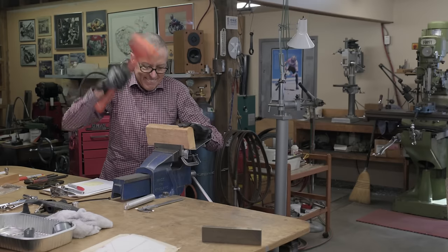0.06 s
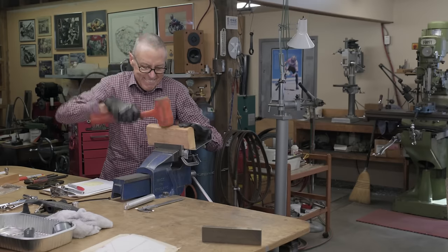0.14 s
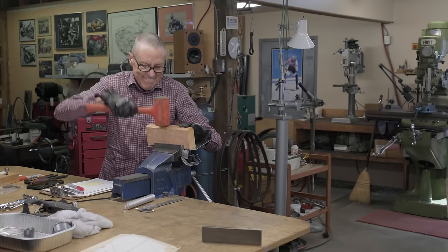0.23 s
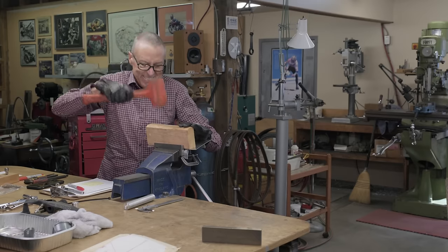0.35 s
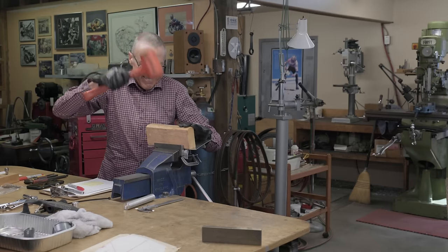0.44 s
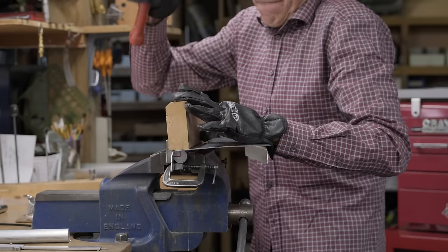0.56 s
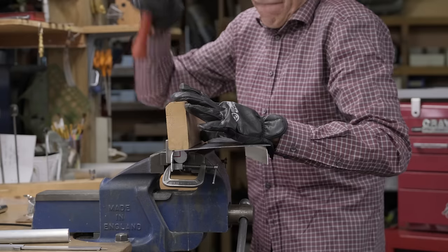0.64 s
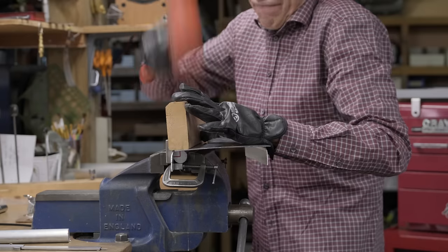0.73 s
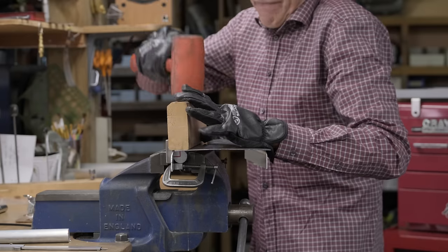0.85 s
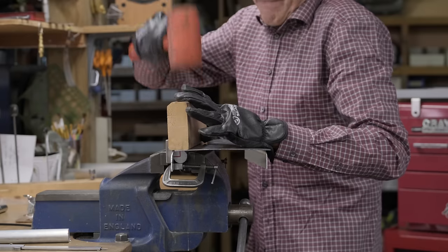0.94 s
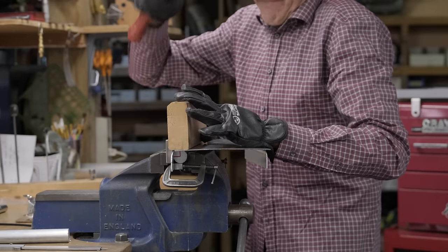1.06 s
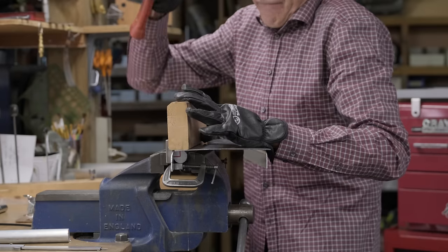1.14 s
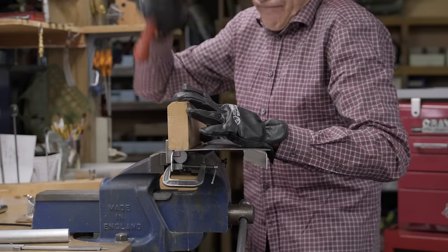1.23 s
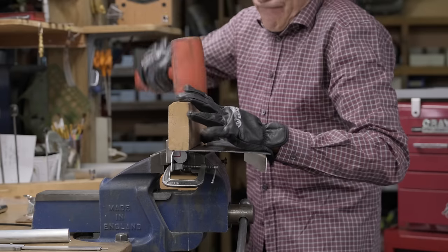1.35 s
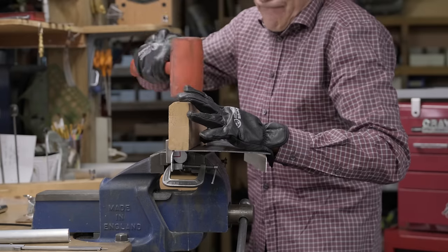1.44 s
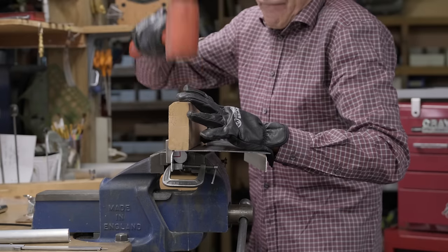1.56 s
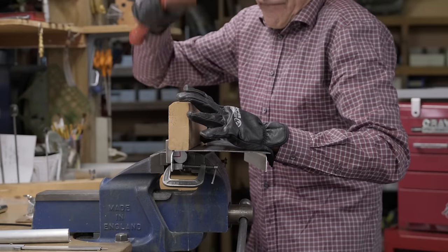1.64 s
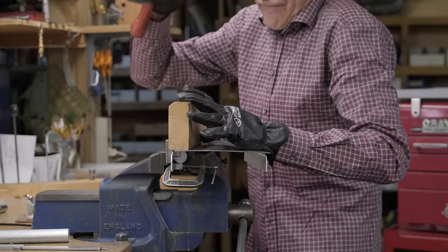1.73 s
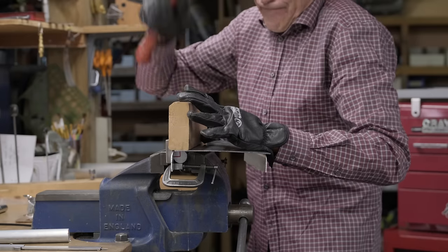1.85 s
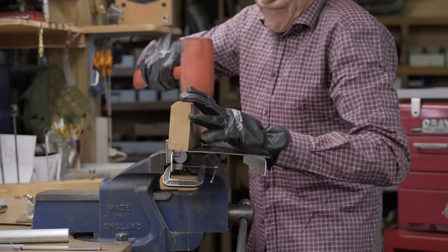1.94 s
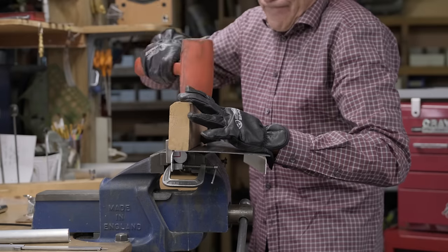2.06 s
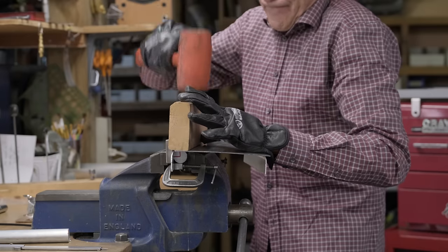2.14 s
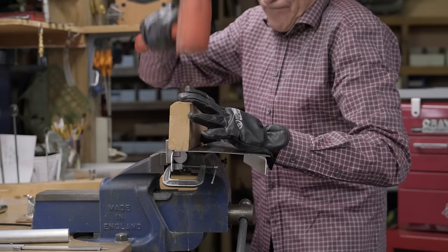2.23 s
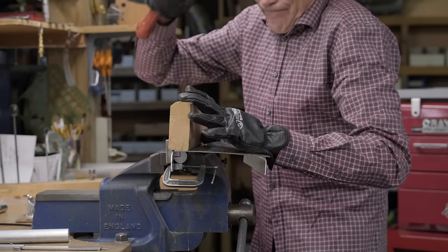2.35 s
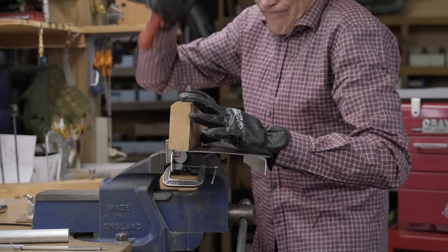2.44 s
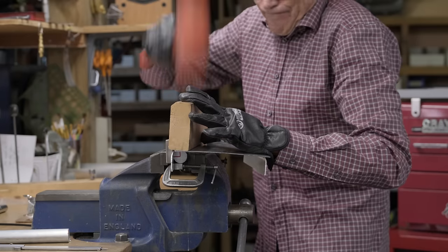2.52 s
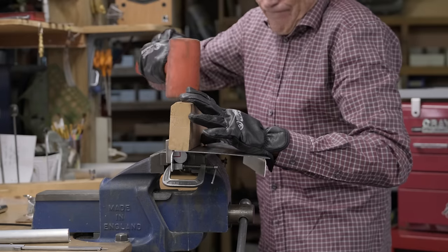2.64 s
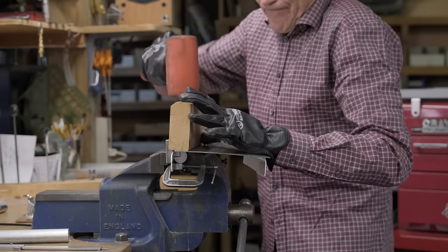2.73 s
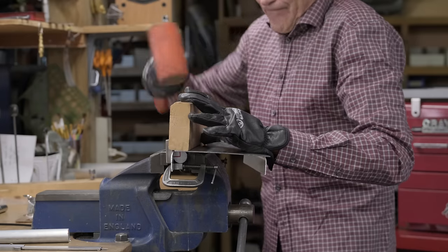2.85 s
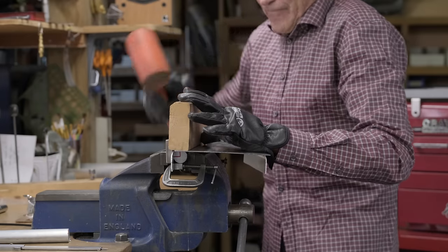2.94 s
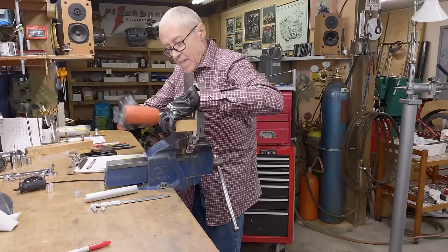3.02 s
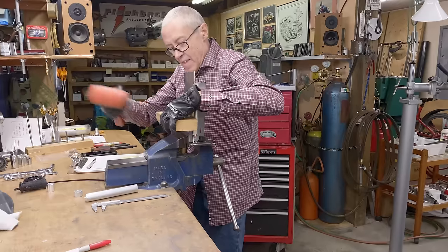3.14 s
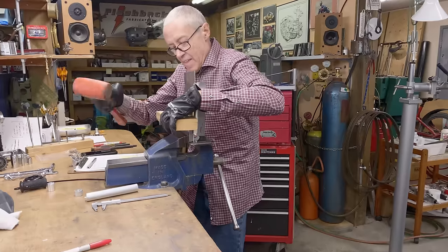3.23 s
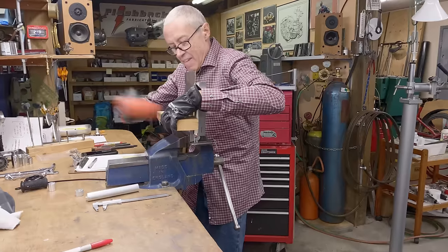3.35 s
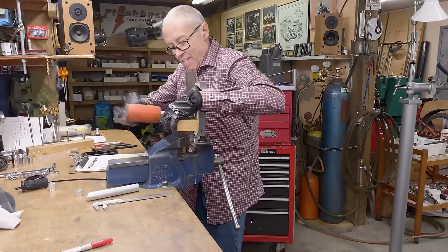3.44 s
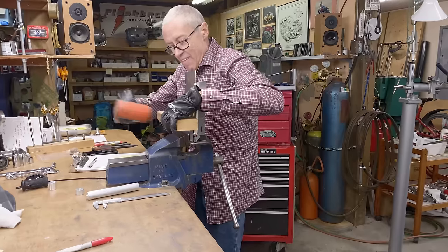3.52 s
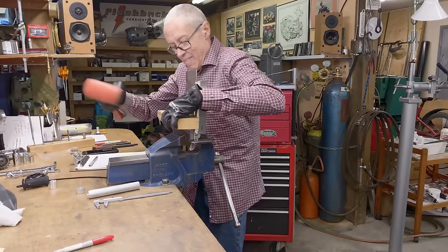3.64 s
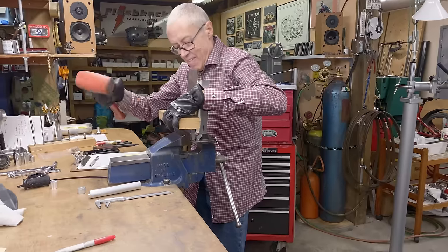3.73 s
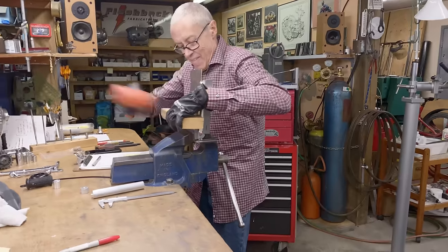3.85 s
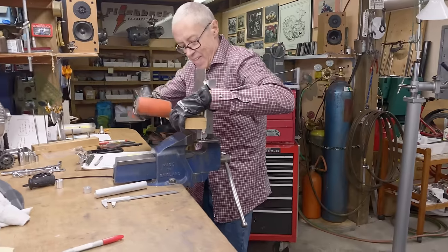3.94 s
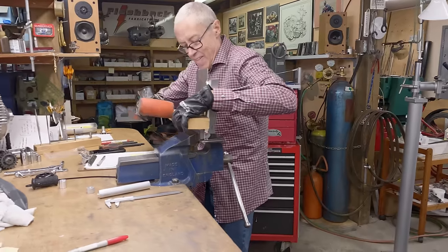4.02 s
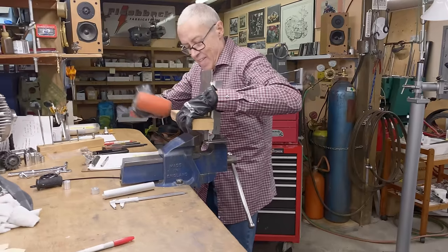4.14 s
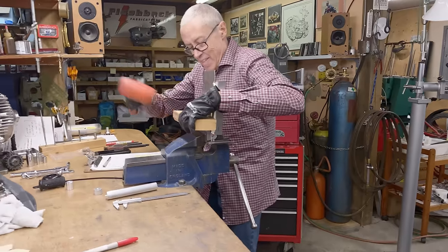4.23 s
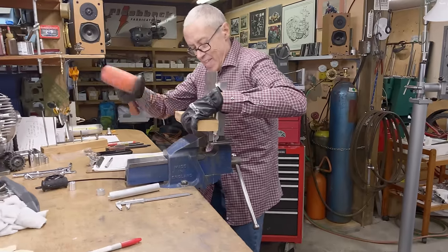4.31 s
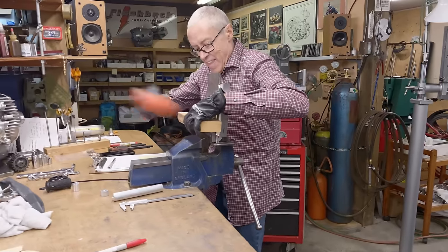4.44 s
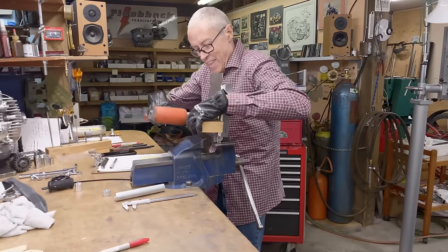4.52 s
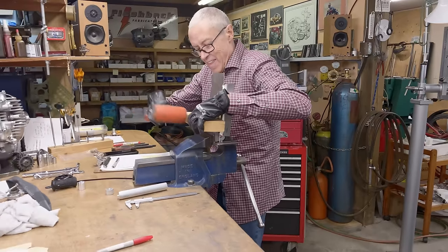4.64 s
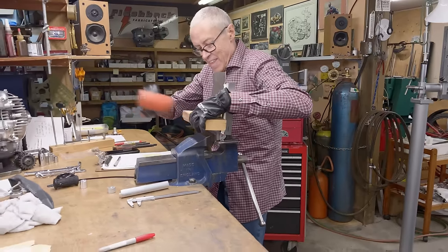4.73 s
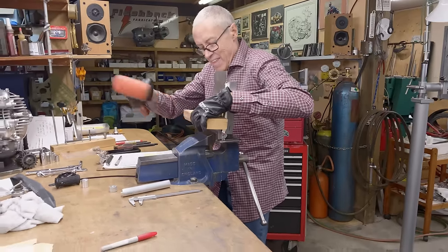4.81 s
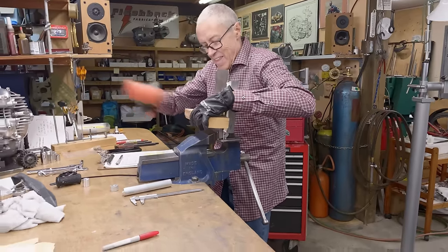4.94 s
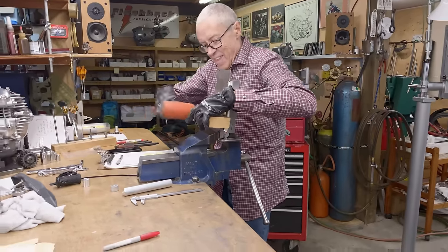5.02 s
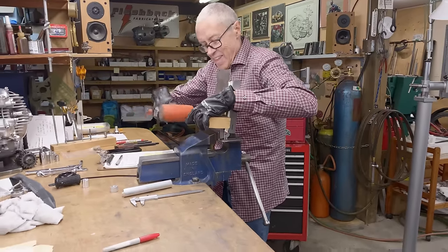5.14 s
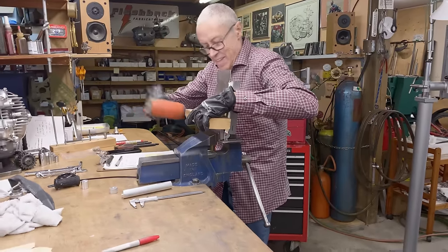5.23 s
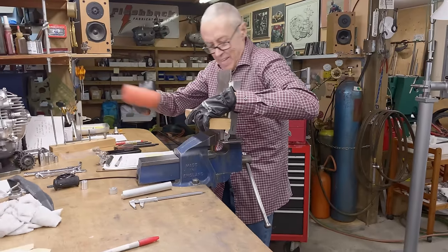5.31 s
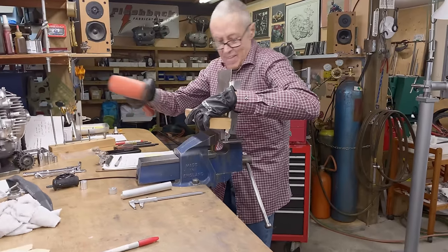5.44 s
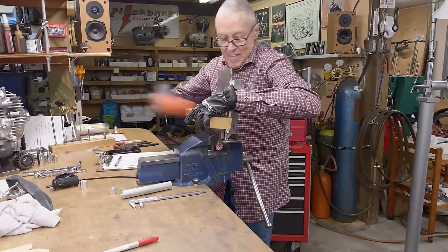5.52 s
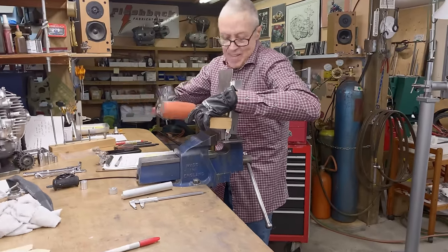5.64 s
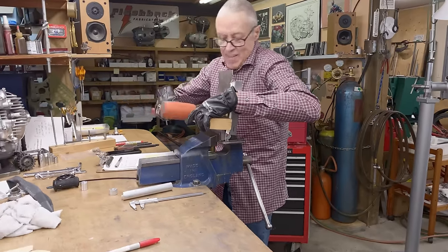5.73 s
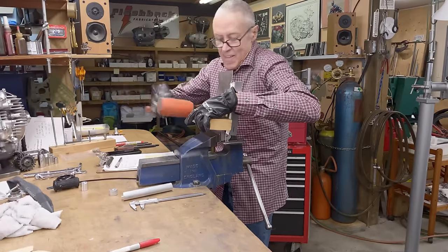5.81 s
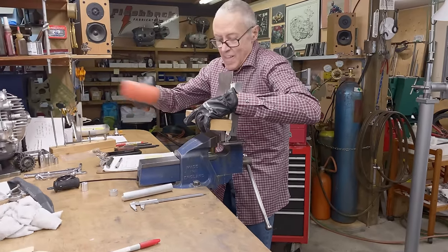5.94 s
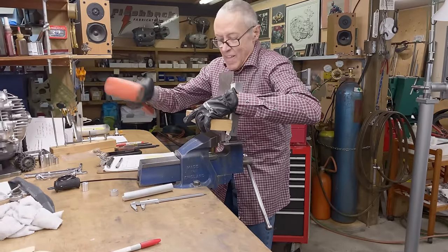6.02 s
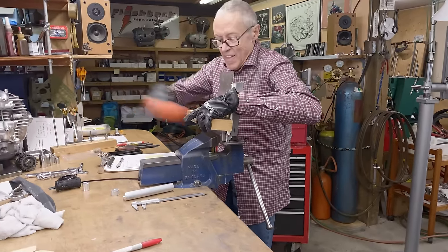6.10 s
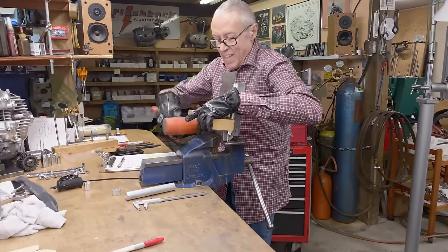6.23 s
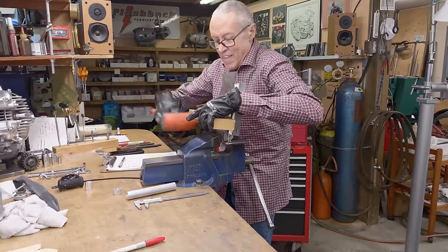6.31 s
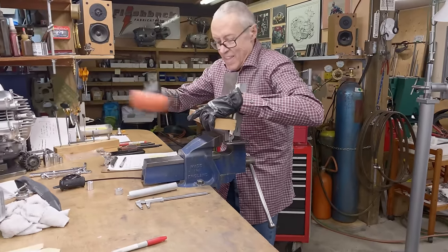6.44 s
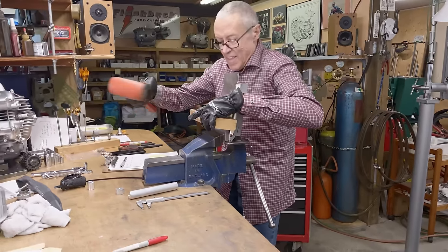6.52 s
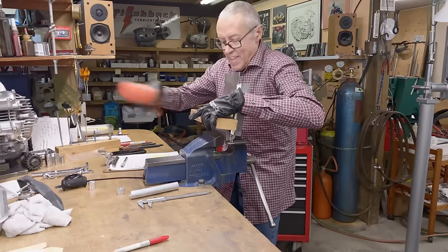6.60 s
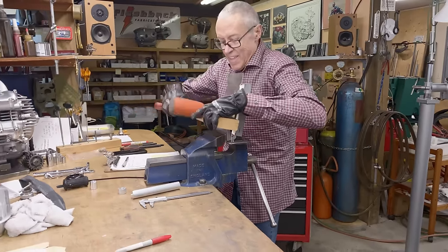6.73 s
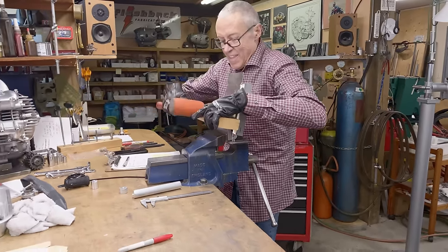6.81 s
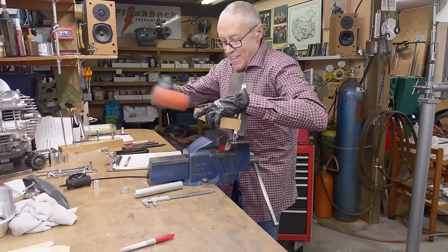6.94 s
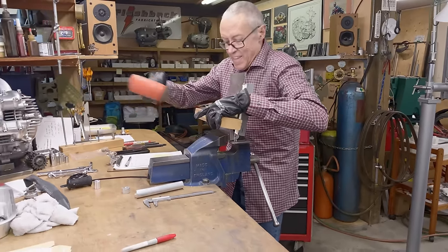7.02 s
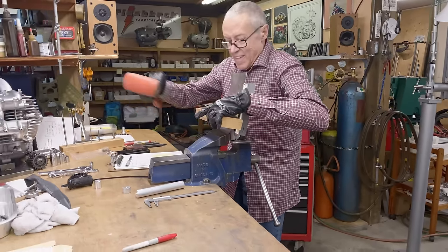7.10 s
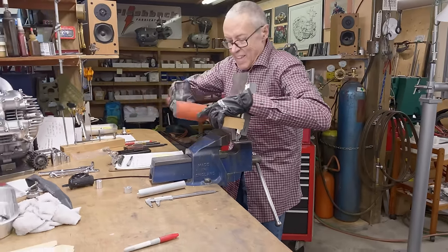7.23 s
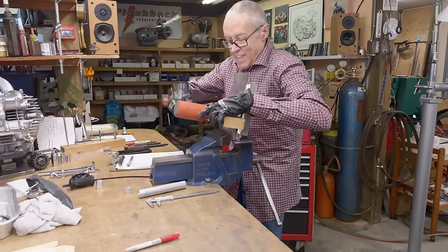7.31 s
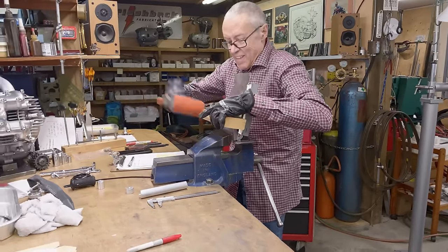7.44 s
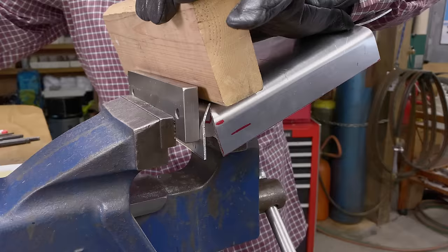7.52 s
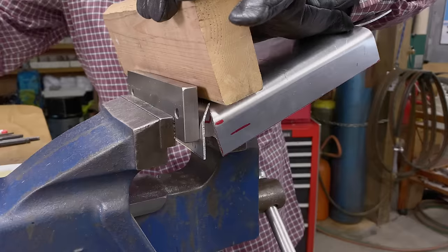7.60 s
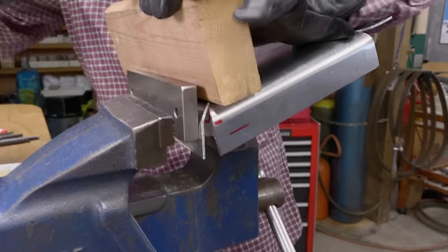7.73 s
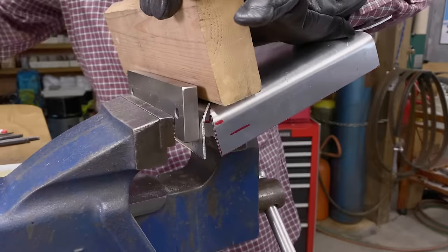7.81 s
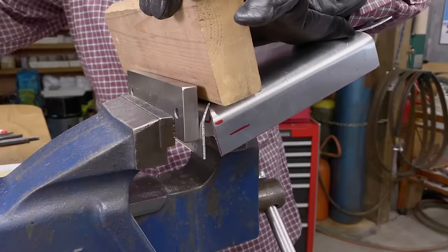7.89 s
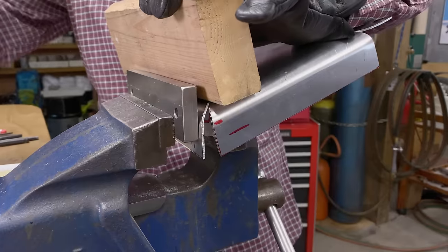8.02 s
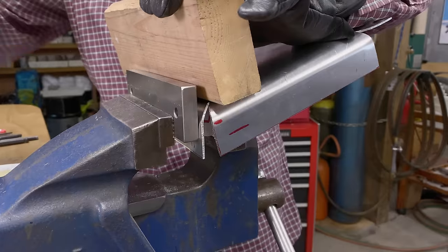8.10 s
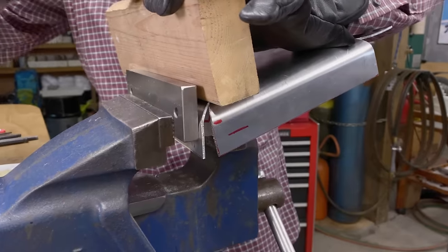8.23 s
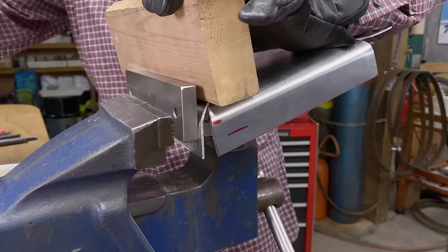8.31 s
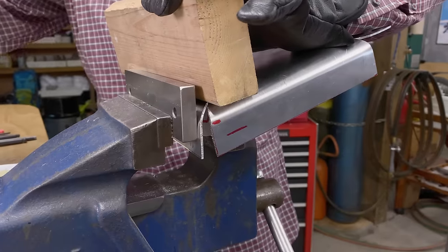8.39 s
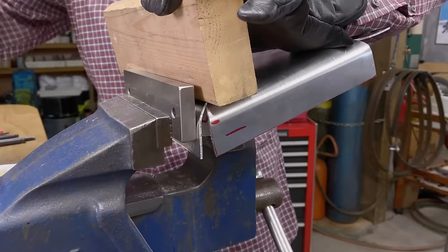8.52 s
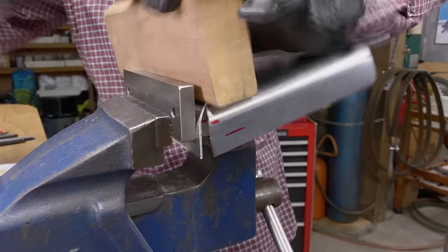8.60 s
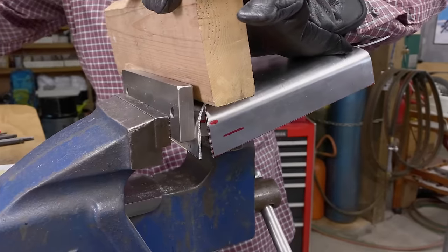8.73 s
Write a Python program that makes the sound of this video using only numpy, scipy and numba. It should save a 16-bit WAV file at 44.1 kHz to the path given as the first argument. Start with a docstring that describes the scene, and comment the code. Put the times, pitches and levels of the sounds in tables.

```python
"""A cluttered workshop, one microphone close to the bench. A shot-filled mallet drives a wooden block
against sheet metal held in a vise, the block first upright, then struck from the side. Each blow cracks,
rings block, sheet and vise and fills the room; side blows also shake loose steel and set the block
clacking. Between blows, swings rustle and small things tick over a low rumble.
The blows overload the microphone and a limiter holds them down."""
import sys
import numpy as np
from scipy import signal
from scipy.fft import rfft, irfft
from scipy.io import wavfile
from scipy.ndimage import uniform_filter1d
from numba import njit

SR = 44100
rng = np.random.default_rng(int(sys.argv[2]) if len(sys.argv) > 2 else 0)


def put_to_file(sound):
    """Save the sound as 16-bit audio at rate SR, in the file named by the first command-line argument."""
    columns = np.atleast_2d(sound).T  # one column per channel
    safe = np.clip(columns, -1, 1)
    whole_steps = np.round(safe * 32767)
    wavfile.write(sys.argv[1], SR, whole_steps.astype(np.int16))


N = 386316

# Room tone. Each row: frequency in Hz, relative level in dB.
ROOM_TONE = [(18, -29.5), (45, 4.5), (100, 1.5), (215, 1.5), (526, -10.5), (1320, -8), (1460, -13),
             (1860, -10), (6720, -24.5), (13300, -16.5), (16000, -34)]
# Low rumble. Each row: time in seconds, level in dB.
RUMBLE_LEVELS = [(0.0, -74), (0.32, -68), (0.68, -75), (0.95, -64.5), (1.1, -70), (2.49, -74), (2.75, -62),
                 (2.85, -55.5), (3.0, -72.5), (3.58, -69), (3.68, -71.5), (5.25, -63.5), (7.46, -63.5),
                 (7.93, -68), (8.64, -68), (8.76, -58)]
# Small ticks, and at 7.659 s a brief burst of ringing as the ringing comes back after the second gap. # Each
# row: start in seconds, level in dB, centre in Hz.
SHORT_SOUNDS = [(0.14, -51.5, 2530), (0.759, -55, 1995), (1.08, -51, 500), (1.31, -60, 2550),
                (1.911, -57.5, 2190), (2.538, -63, 2200), (3.087, -61.5, 1502), (3.112, -64.5, 2500),
                (3.167, -67, 1496), (3.213, -54.5, 1500), (3.34, -67.5, 1169), (4.238, -49.5, 608.9),
                (4.889, -54, 910), (6.56, -50, 1032), (6.596, -50.5, 1025), (7.211, -57, 600),
                (7.659, -55.5, 1536), (8.053, -56.5, 1300), (8.087, -57, 595)]
# Mallet blows. Each row: start in seconds, level in dB, low knock in Hz and dB, high knock in Hz and dB,
# crack in dB, vise ping in dB, shudder in seconds, t60 of the damping after it in seconds.
MALLET_BLOWS = [(0.166, -10, 931, -4.5, 1495, -2.5, 0.5, -38.5, 0.036, 0.18),
                (0.781, -10, 1257, -3, 1650, -13.5, 3.5, -38.5, 0.038, 0.38),
                (1.337, -9, 1092, -6, 2153, -10, 4.5, -39.5, 0.05, 0.43),
                (1.946, -10.5, 895, -6, 1512, -3.5, 3.5, -36, 0.042, 0.22),
                (2.571, -8.5, 1290, -6.5, 1550, -8, 3, -38.5, 0.045, 0.18),
                (3.393, -12.5, 1262, -1.5, 1860, -6.5, -16.5, -33, 0.054, 0.18),
                (3.906, -14.5, 1255, -1, 1722, -2, -8, -38.5, 0.048, 0.11),
                (4.482, -12.5, 1273, -1, 1760, -6, -12, -31.5, 0.036, 0.11),
                (5.004, -10.5, 1257, -7.5, 1736, -11, -11, -32, 0.046, 0.12),
                (5.555, -9, 963, -5.5, 1720, -3, -10, -38, 0.046, 0.11),
                (6.145, -12, 943, -4.5, 1465, -16, -11, -42.5, 0.028, 0.4),
                (6.689, -8.5, 960, -4.5, 1826, -6, -12.5, -35.5, 0.05, 0.09),
                (7.229, -10, 979, -1, 1836, -4.5, -7.5, -40, 0.034, 0.092),
                (7.693, -10, 997, -2.5, 1803, -3.5, -17.5, -42, 0.015, 0.07),
                (8.141, -10.5, 918, 2.5, 1793, 1, -11.5, -37.5, 0.011, 0.078),
                (8.613, -12, 892, -5, 1826, -4, -9, -41, 0.0082, 0.11)]
# The block held upright, from the side, then at the far bend. Each row: start in seconds; thud, body,
# chatter, sheet, shimmer and vise hum in dB; room tilt in dB per octave; room decay factor; room in dB;
# damping once pressed in dB; thud in Hz; bench sway in Hz and dB.
BLOCK_GRIPS = [(0, -25.5, -21, -24, -10, -54.5, -40.5, 0, 0.98, -6, 0, 130., 57., -38),
               (3.1, -17.5, -12, -18.5, -9.5, -59.5, -46, -6, 1, -7.5, -4.5, 147, 74., -43),
               (7.6, -15.5, -23, -28.5, -14, -57.5, -45, -3.5, 0.76, -6.5, -2.5, 114, 57., -34.5)]
# Modes of the sheet (block upright, block sideways), the loose steel and the vise.
# Each row: frequency in Hz, level in dB, t60 in seconds.
SHEET_UPRIGHT = [(424, -13.5, 0.28), (889, 0, 0.29737), (952, -2.5, 0.37), (1054.5, -4, 0.33),
                 (1145, -4, 0.26), (1272.5, -4, .28), (1420, -9, 0.12), (1580, -4.5, .3),
                 (1640, -9.5, 0.28), (2068, -10.5, 0.44), (2320, -12, 0.16), (2750, -12.5, 0.55),
                 (3350, -18.5, 0.16), (3980, -20.5, 0.45), (4120, -22.5, 0.61), (4979, -19, 0.46),
                 (5850, -25, 0.59), (6550, -23.5, .35), (8700, -28.5, 0.32)]
SHEET_SIDEWAYS = [(415.7, -4, 0.25), (550.5, -11, 0.19), (694.6, -5.5, 0.22), (974.37, -1, 0.3),
                  (986, -12, 0.27), (1204, -23, 0.14), (1276, -3.5, 0.21), (1726, -15, 0.4),
                  (1900, -11.5, 0.43), (1935, 3, 0.15), (2015, -27, 0.71), (2837.2, -24.5, 0.31),
                  (2660, -21, 0.4), (3640, -30.5, 0.38), (3915.8, -32.5, 0.29), (4330, -28, 0.35)]
STEEL_MODES = [(6940, -2, .04), (8600, -5.5, 0.14), (9350, 0.5, 0.062), (10500, -9, .08), (11200, -8, 0.12),
               (12700, 4.5, 0.1), (14500, -6, .05)]
VISE_HUM, VISE_PING = [(1060, -4, 0.98), (1980, -5.5, 1.3)], [(3955, 1.5, 0.42)]
# Reflections. Each row: frequency in Hz, level in dB, early and late t60 in seconds.
ROOM_BANDS = [(60.57, -33, 0.13, 0.58), (130, -15, 0.18, 0.81), (294, -12, 0.18, 0.75),
              (594, -6.5, 0.18, 0.39), (1000, 1, 0.15, 0.65), (1970, 5, 0.16, 0.59),
              (3840, -4.5, 0.23, 0.79), (7700, -12.5, 0.19, 0.68), (14950, -22.5, 0.25, 0.38)]
# Swings. Each row: middle in seconds, treble in dB, low swish in dB.
MALLET_SWINGS = [(0.616, -70, -66.5), (1.22, -74, -76), (1.826, -76.5, -77), (2.462, -71.5, -74),
                 (2.924, -71, -68), (3.0, -83, -69), (3.28, -66.5, -73.5), (3.80, -76, -72),
                 (4.396, -71, -71), (4.916, -68, -62.5), (5.459, -72, -62), (6.042, -65, -65),
                 (6.598, -74, -62), (7.135, -71, -65.5), (7.589, -59.5, -76), (7.679, -63, -57.5),
                 (8.044, -67, -66), (8.503, -65.5, -70)]
# Gaps where the ring of a blow drops out. Each row: start and end in seconds.
RING_GAPS = [(3.017, 3.39), (7.557, 7.656)]
# The loudest chinks. Each row: start in seconds, level in dB, tilt in dB per octave.
STEEL_CHINKS = [(3.41, -24, -1.5), (3.927, -40.5, -2), (4.523, -38.5, 10), (4.572, -45.5, 19),
                (5.033, -34, 6.5), (5.583, -33.5, -0.5), (5.616, -40, 9), (6.168, -27, -2.5),
                (6.188, -39.5, 4), (6.717, -24, -13), (6.730, -29, 5.5), (6.754, -37, 13), (7.26, -25.5, 4),
                (7.716, -25, 0), (8.173, -26, -6), (8.191, -36, -4), (8.641, -27, -2), (8.661, -33, -3)]
# Clacks of the block. Each row: start in seconds, level in dB.
BLOCK_CLACKS = [(3.927, -21.5), (4.525, -36.5), (5.035, -19), (5.049, -30), (5.094, -43), (5.583, -17),
                (5.599, -21), (6.169, -18.5), (6.717, -10.5), (7.726, -16.5), (7.758, -29.5), (7.785, -37),
                (8.164, -20), (8.174, -13), (8.23, -32.5), (8.633, -17.5), (8.646, -17)]

SIDEWAYS_FROM_S, PRESS_S, DRIVE_DB = 3.1, 0.039, 4.5
ROOM_TONE_DB, LATE_ROOM_DB = -70, -23.5
LIMIT_DB, LAG_S, ATTACK_S, RELEASE_S = -15.5, .004, 0.0036, 0.023
CEILING, LOW_CUT_HZ, TOP_CUT_HZ = .31, 78, 16100


def undb(db):
    return 10 ** (np.asarray(db) / 20)


def fade(t, t60):
    return np.exp(-np.log(1000) * t / t60)


def band(size, hz, octaves):
    """Noise of rms 1 in a bell-shaped band."""
    f = np.arange(1, size // 2 + 2) * SR / size
    x = irfft(rfft(rng.standard_normal(size)) * np.exp(-(np.log2(f / hz) / octaves) ** 2), size)
    return x / x.std()


def add(out, s, x):
    i = min(int(s * SR), N)
    out[i:i + len(x)] += x[:N - i]


def ring(t, modes, scatter_db, detune):
    """Struck steel: each mode is three close, fading sines, a little different every time."""
    hz, db, t60 = np.transpose(modes)[:, :, None]
    strength = rng.standard_normal((len(modes), 1))
    tunings = 1 + detune * rng.standard_normal((3, len(modes), 1))
    waves = sum(np.sin(2 * np.pi * hz * k * t) * share for k, share in zip(tunings, (1, .4, .3)))
    return np.sum(undb(db + scatter_db * strength) * waves * fade(t, t60), axis=0)


def shop_ambience():
    """Quiet room tone and an uneven low rumble around the microphone."""
    hz, db = np.transpose(ROOM_TONE)
    f = np.arange(1, N // 2 + 2) * SR / N
    tone = irfft(rfft(rng.standard_normal(N)) * undb(np.interp(np.log(f), np.log(hz), db)), N)
    s, rumble_db = np.transpose(RUMBLE_LEVELS)
    flicker = uniform_filter1d(np.repeat(rng.standard_normal(N // 1024 + 1), 1024)[:N], 1024)
    rumble = band(N, 220, 0.94) * undb(np.interp(np.arange(N) / SR, s, rumble_db) + 2.1 * flicker)
    return undb(ROOM_TONE_DB) * tone / tone.std() + rumble


def tick(t, hz):
    """A small thing ticks somewhere in the shop, or the ringing bursts briefly back."""
    return band(len(t), hz, .9) * fade(t, .022)


def block_knock(t, low_hz, low_db, high_hz, high_db, body_db, shudder_s, t60):
    """The wooden block shudders against the sheet, then is pressed still."""
    knock = undb(low_db) * band(len(t), low_hz, .07) + undb(high_db) * band(len(t), high_hz, 0.057)
    bark = undb(-8.5) * band(len(t), 1400, 1)
    body = undb(body_db) * band(len(t), 420, .5)
    return (knock + bark + body) * fade(np.maximum(t - shudder_s, 0), t60) * fade(t, 0.55)


def sheet_ring(t, modes):
    """The clamped sheet is uneven, so each mode is a dense cluster that rasps as it fades."""
    return sum(undb(db + 1.4 * rng.standard_normal()) * band(len(t), hz, .07) * fade(t, t60)
               for hz, db, t60 in modes)


def crack(t):
    """The impact itself, bright and brief."""
    return band(len(t), 3300, 1) * fade(np.maximum(t - .008, 0), 0.018)


def bench_thud(t, thud_hz, thud_db, sway_hz, sway_db):
    """The blow thuds through the bench, which sways on, deep and faint."""
    thud = band(len(t), thud_hz, 0.39) * fade(t, .2) * (1 - np.exp(-t / 0.0011))
    sway = band(len(t), sway_hz, .15) * fade(t, 0.49) * (1 - np.exp(-t / .03))
    return undb(thud_db) * thud + undb(sway_db) * sway


def chatter(t):
    """Jaw, clamp and sheet chatter in quick, uneven clicks."""
    clicks = (rng.random(len(t)) < 400 / SR) * undb(2.3 * rng.standard_normal(len(t)))
    bursts = signal.lfilter([1], [1, -fade(1 / SR, 0.018)], clicks)
    settling = fade(np.maximum(t - 0.042, 0), 0.03) * fade(t, 0.32)
    return bursts * undb(1.5) * band(len(t), 3600, 1.3) * settling


def shimmer(t):
    """The top of the treble flickers on in patches."""
    patches = uniform_filter1d(np.repeat(rng.standard_normal(64), 512), 256)
    return band(len(t), 13300, .17) * undb(2.5 * patches - 3) * fade(t, .9)


def vise_ring(t, hum_db, ping_db):
    """The vise rings on with a long, thin hum and a higher ping."""
    return undb(hum_db) * ring(t, VISE_HUM, 2.5, .006) + undb(ping_db) * ring(t, VISE_PING, 1.1, .0002)


def reflections(t, tilt_db):
    """The room answers: each band fades fast at first, then at the slower rate of the far corners."""
    hz, *columns = np.transpose(ROOM_BANDS)
    out = 0
    for centre in 50 * 2 ** np.arange(0, 8.4, .5):
        db, early, late = (np.interp(np.log(centre), np.log(hz), c) for c in columns)
        db += tilt_db * np.log2(np.clip(centre / 1500, 1, 6))
        decay = fade(t, early) + undb(LATE_ROOM_DB) * fade(t, late)
        out += undb(db) * decay * band(len(t), centre, .4)
    return out * (1 - np.exp(-t / 0.0016))


def blow(s, db, low_hz, low_db, high_hz, high_db, crack_db, ping_db, shudder_s, t60):
    """One mallet blow sounds block, sheet, bench, vise and room, coloured by the grip on the block."""
    grip = [row for row in BLOCK_GRIPS if row[0] <= s][-1]
    thud_db, body_db, chatter_db, sheet_db, shimmer_db, hum_db = grip[1:7]
    tilt_db, stretch, room_db, press_db, thud_hz, sway_hz, sway_db = grip[7:]
    t = np.arange(32768) / SR
    rise = 1 - np.exp(-t / 0.00042)
    modes = SHEET_UPRIGHT if s < SIDEWAYS_FROM_S else SHEET_SIDEWAYS
    pressed = undb(press_db * np.clip((t - shudder_s) / PRESS_S, 0, 1))  # the block damps the sheet
    parts = (block_knock(t, low_hz, low_db, high_hz, high_db, body_db, shudder_s, t60)
             + undb(sheet_db) * sheet_ring(t, modes) * pressed
             + undb(crack_db) * crack(t)
             + bench_thud(t, thud_hz, thud_db, sway_hz, sway_db)
             + undb(chatter_db) * chatter(t)
             + undb(shimmer_db) * shimmer(t)
             + vise_ring(t, hum_db, ping_db)
             + undb(room_db) * reflections(t / stretch, tilt_db) * np.sqrt(pressed))
    return undb(db + DRIVE_DB) * parts * rise


def mallet():
    """The run of blows; twice the ringing stops short."""
    out, t = np.zeros(N), np.arange(N) / SR
    for row in MALLET_BLOWS:
        add(out, row[0], blow(*row))
    for start, end in RING_GAPS:
        out *= np.clip(np.maximum(start - t, t - end) / 0.002157 + 1, 0, 1)
    return out


def swing(t, treble_db, low_db, width_s=0.035):
    """A swing rustles past the microphone, loudest at t = 0."""
    rustle = undb(treble_db) * band(len(t), 6700, 2.91) + undb(low_db) * band(len(t), 820, 0.69)
    return rustle * np.exp(-(2 * t / width_s) ** 2)


def chink(t, tilt_db):
    """Loose steel bounces on the vise: a click and a faint, high ring."""
    modes = [(hz, db + tilt_db * np.log2(hz / 10000), t60) for hz, db, t60 in STEEL_MODES]
    click = band(len(t), 10000 * 2 ** (tilt_db / 20), 0.56) * fade(t, 0.022)
    return click + undb(-17) * ring(t, modes, scatter_db=4, detune=.008)


def small_bounces(count=3, gap_s=.022, dying_db_per_s=230):
    """Rows of fainter, brighter chinks that die away at uneven gaps after each side blow."""
    rows = []
    for s in [row[0] for row in MALLET_BLOWS if row[0] > SIDEWAYS_FROM_S]:
        gap, softness, tilt = rng.random((count, 3)).T
        delay = .022 + np.cumsum(2 * gap_s * gap)
        rows += zip(s + delay, -35.5 - dying_db_per_s * delay - 6 * softness, 6.5 + 8 * (tilt - .5))
    return rows


def clack(t):
    """The block clacks back against the sheet."""
    return band(len(t), 3103, 0.47) * fade(t, 0.038)


def scene():
    """The workshop as it reaches the microphone, in mono."""
    out, t = mallet() + shop_ambience(), np.arange(8192) / SR
    for s, db, hz in SHORT_SOUNDS:
        add(out, s, undb(db) * tick(t, hz))
    for s, treble_db, low_db in MALLET_SWINGS:
        add(out, s - .09, swing(t - .09, treble_db, low_db))
    for s, db, tilt_db in STEEL_CHINKS + small_bounces():
        add(out, s, undb(db) * chink(t, tilt_db))
    for s, db in BLOCK_CLACKS:
        add(out, s, undb(db) * clack(t))
    return out[None]


@njit
def follow(x, attack, release):
    """The limiter's level follower, quick up and slower down."""
    level, levels = 0., np.empty(len(x))
    for i in range(len(x)):
        level += (abs(x[i]) - level) * (attack if abs(x[i]) > level else release)
        levels[i] = level
    return levels


def record(dry):
    """The limiter reacts late, so the front of each blow clips flat; then bass cut and top cut."""
    level = follow(dry[0], 1 / (ATTACK_S * SR), 1 / (RELEASE_S * SR))
    late = np.interp(np.arange(N) - LAG_S * SR, np.arange(N), level)
    held = dry * np.minimum(1, undb(LIMIT_DB) / (late + 1e-9)) ** 0.73
    clipped = held / (1 + np.abs(held / CEILING) ** 6) ** (1 / 6)
    thin = signal.sosfilt(signal.butter(3, LOW_CUT_HZ, "highpass", fs=SR, output="sos"), clipped)
    return signal.sosfilt(signal.ellip(8, .2, 70, TOP_CUT_HZ, fs=SR, output="sos"), thin)


dry = scene()
out = record(dry)
put_to_file(out)
```